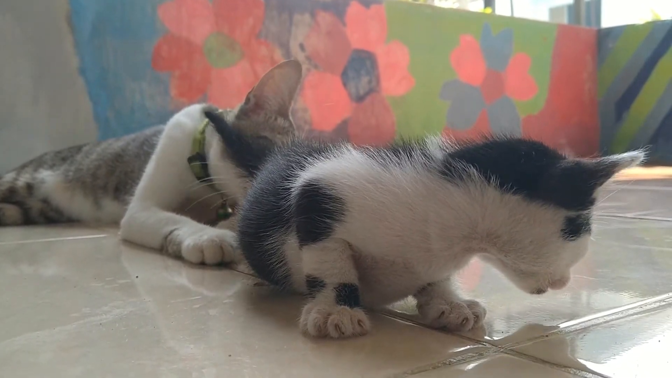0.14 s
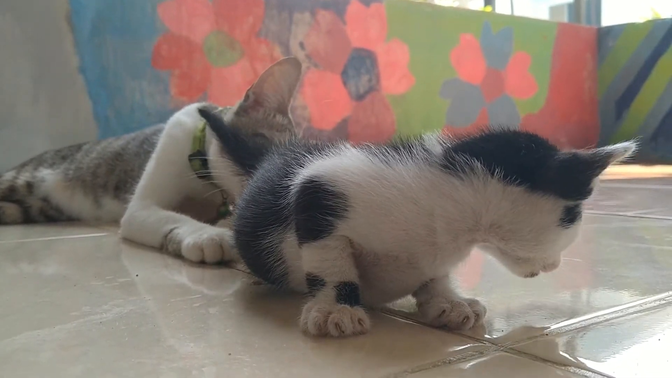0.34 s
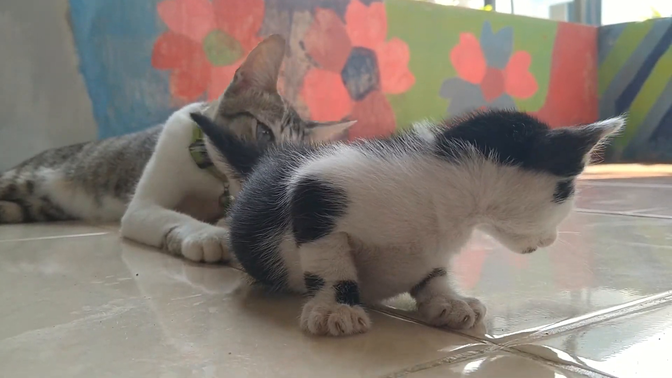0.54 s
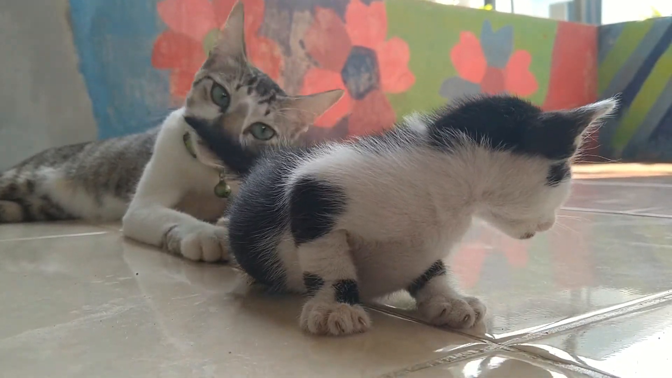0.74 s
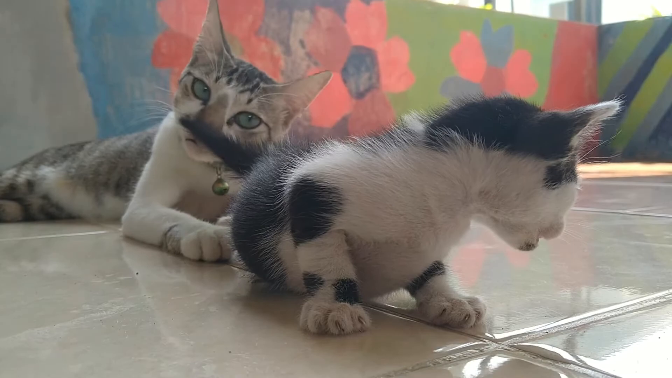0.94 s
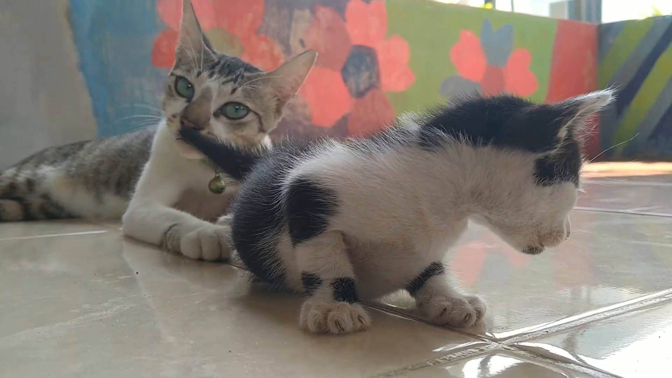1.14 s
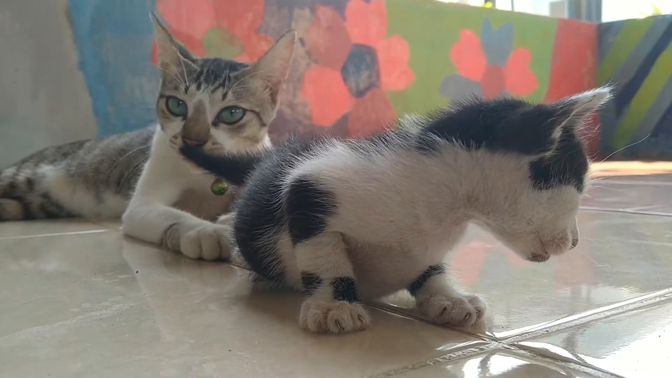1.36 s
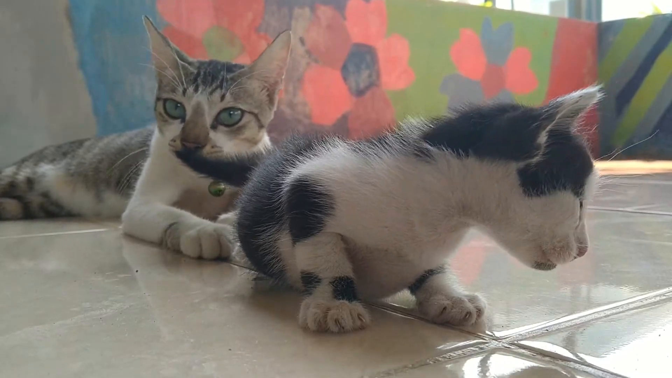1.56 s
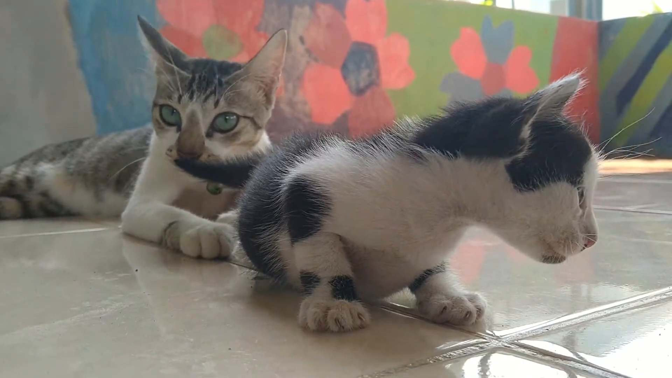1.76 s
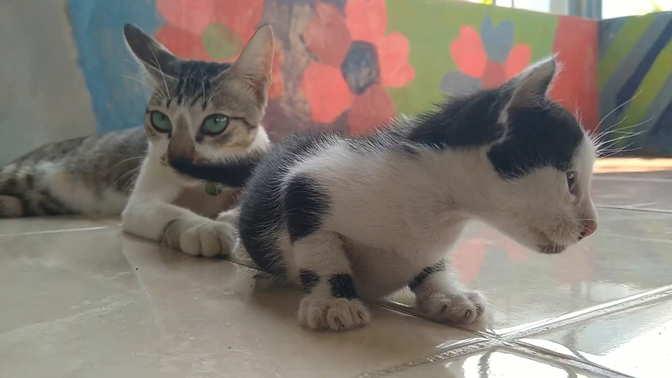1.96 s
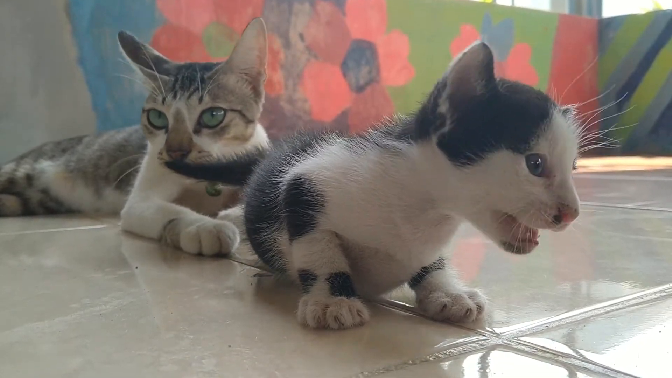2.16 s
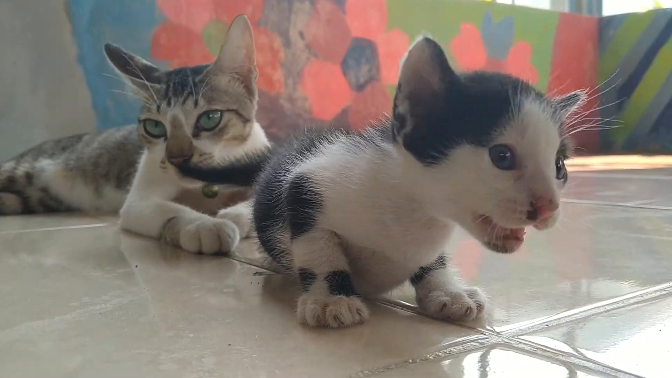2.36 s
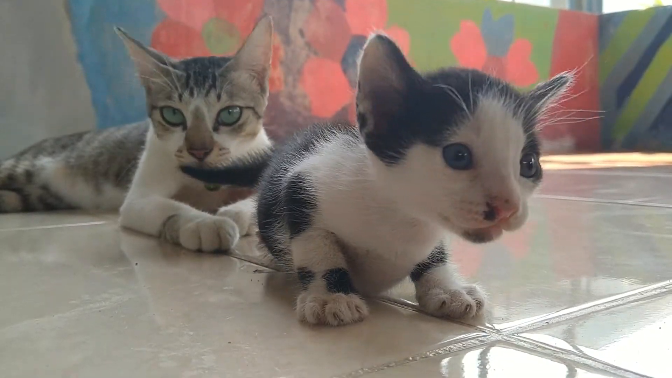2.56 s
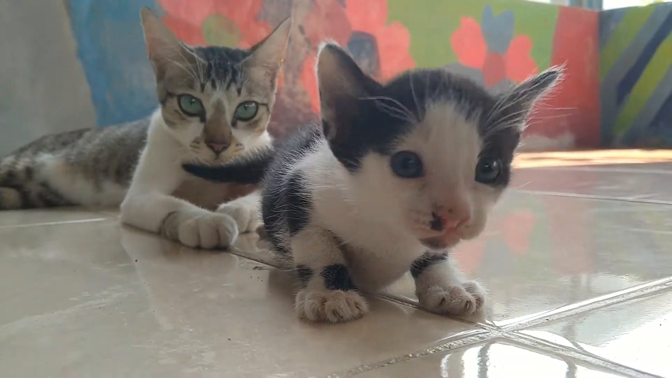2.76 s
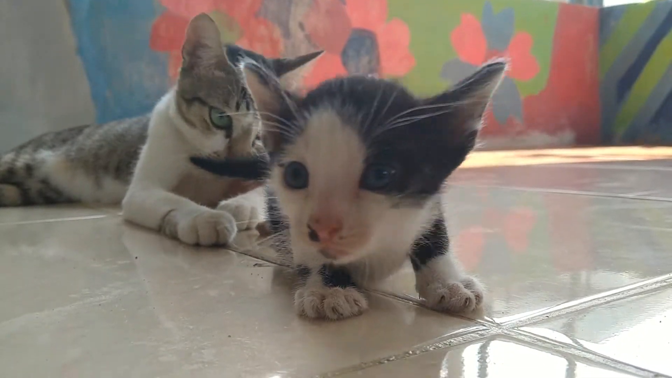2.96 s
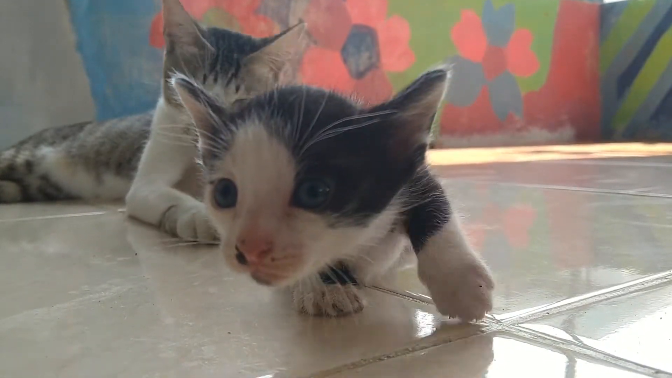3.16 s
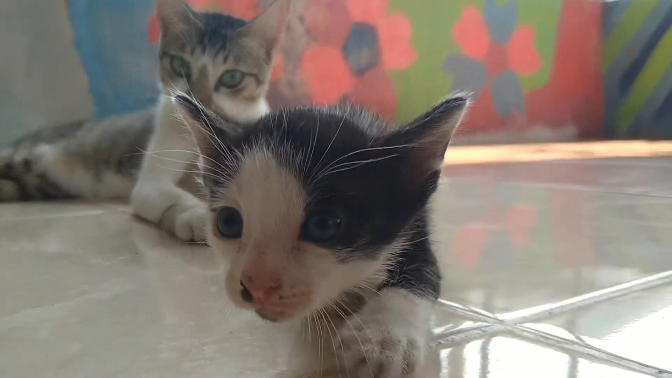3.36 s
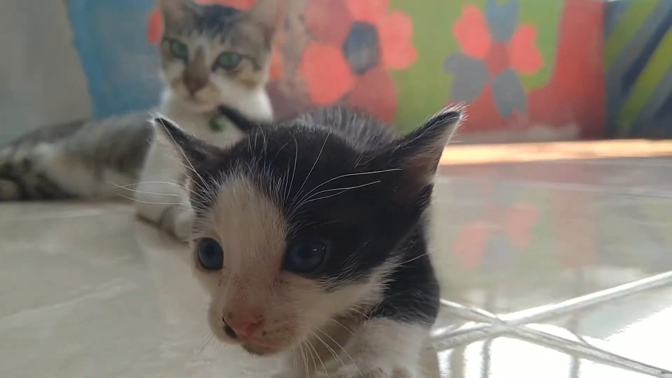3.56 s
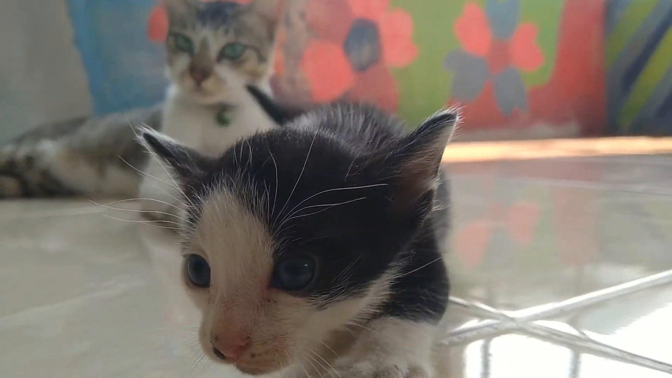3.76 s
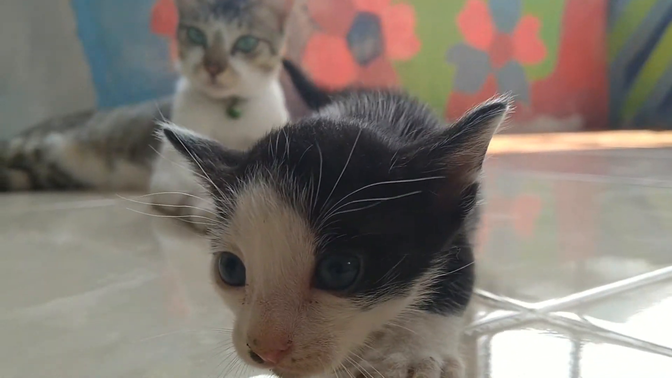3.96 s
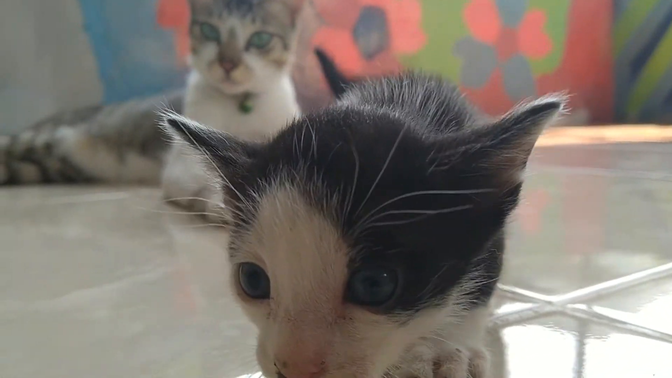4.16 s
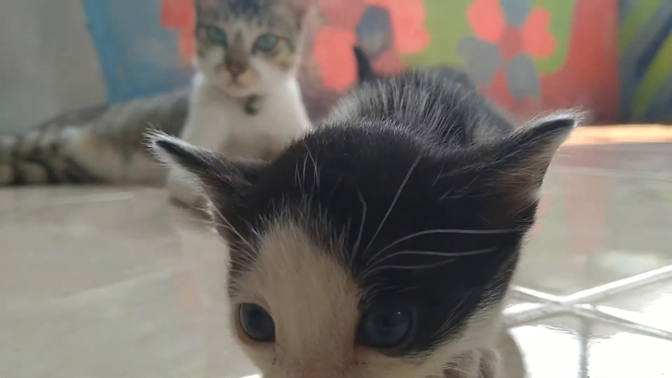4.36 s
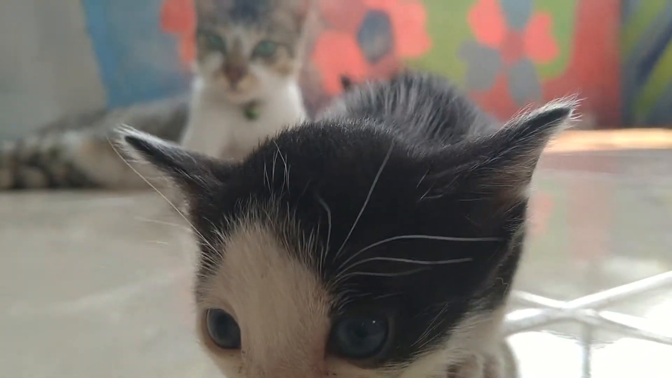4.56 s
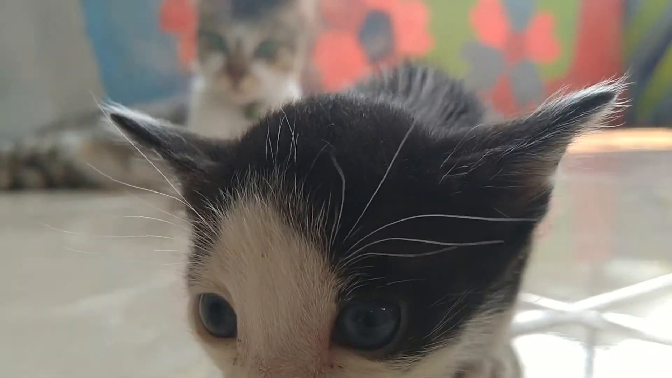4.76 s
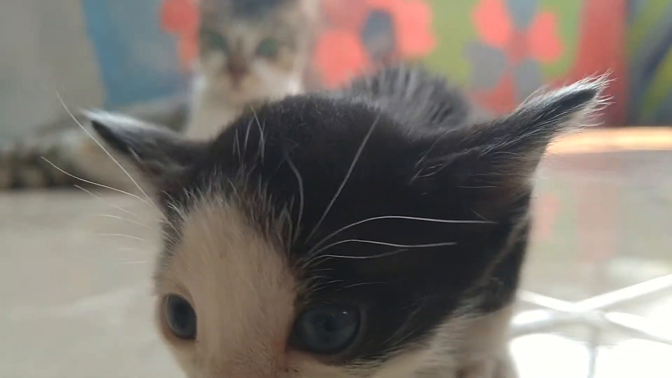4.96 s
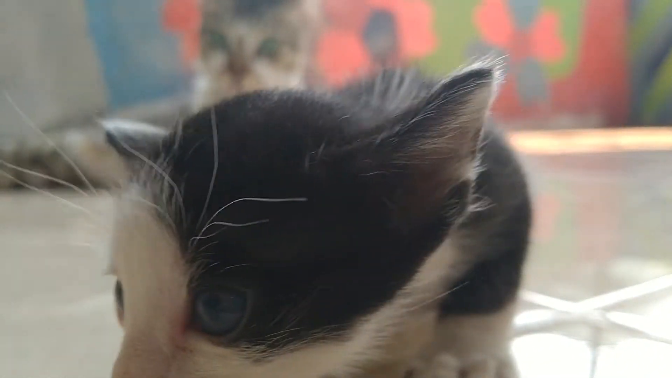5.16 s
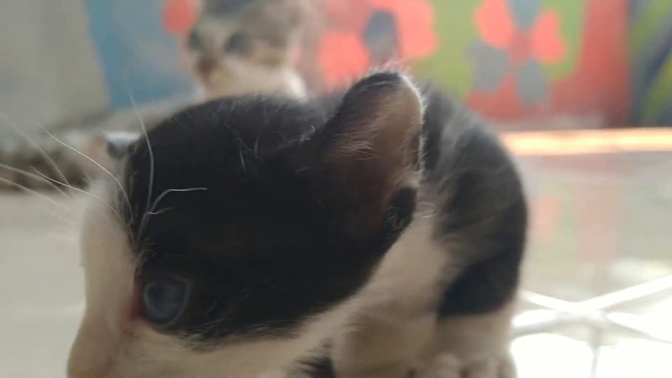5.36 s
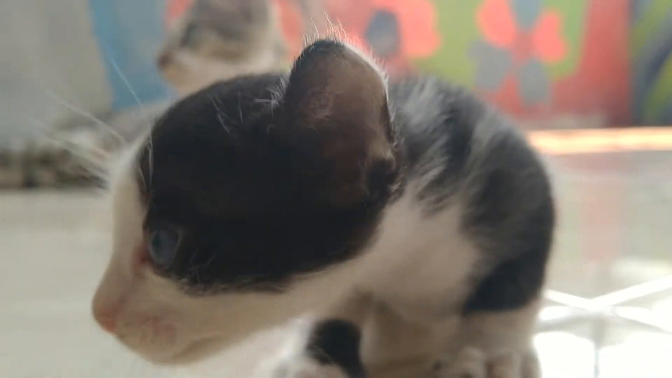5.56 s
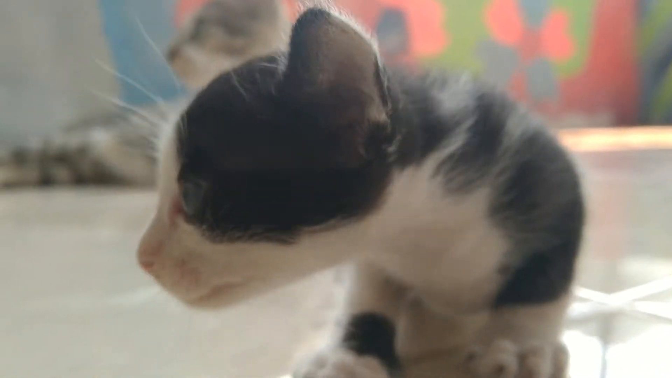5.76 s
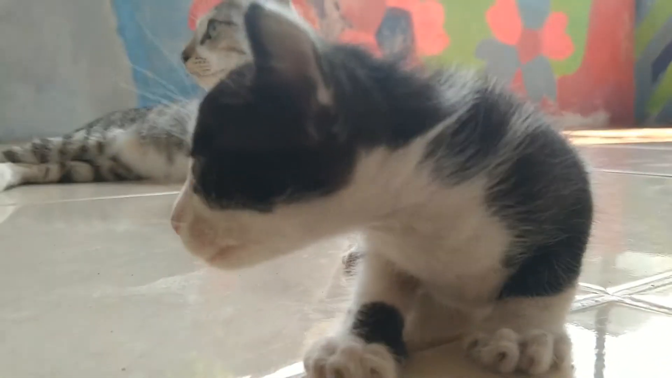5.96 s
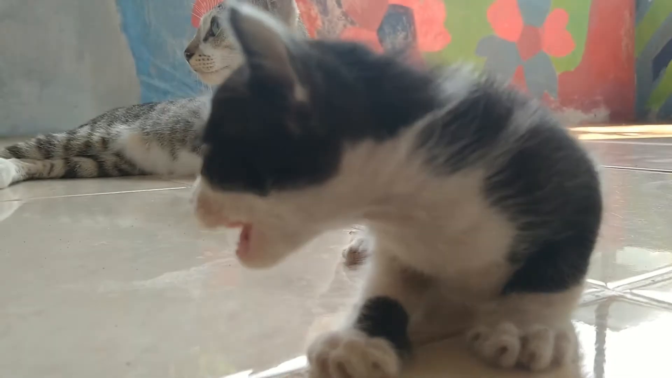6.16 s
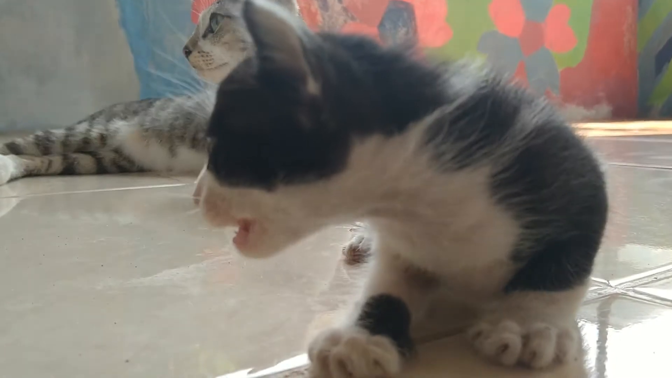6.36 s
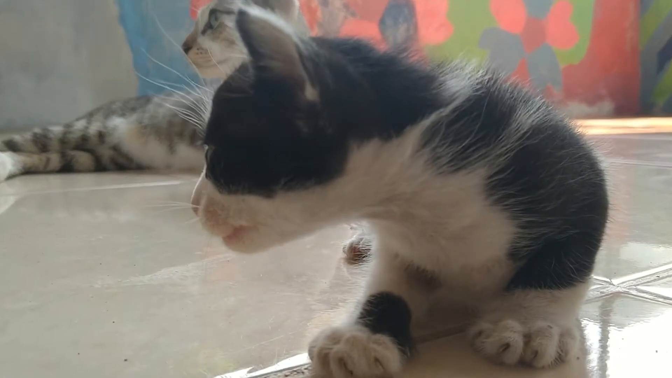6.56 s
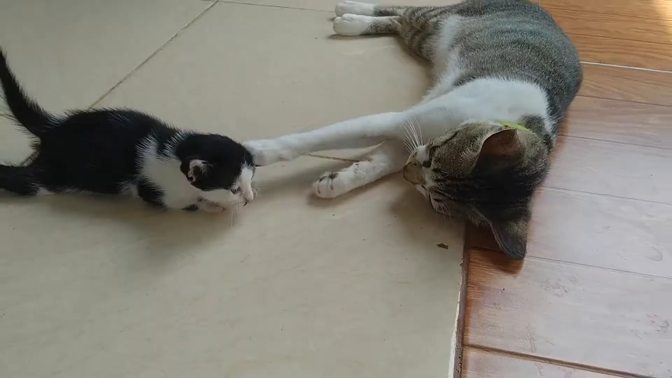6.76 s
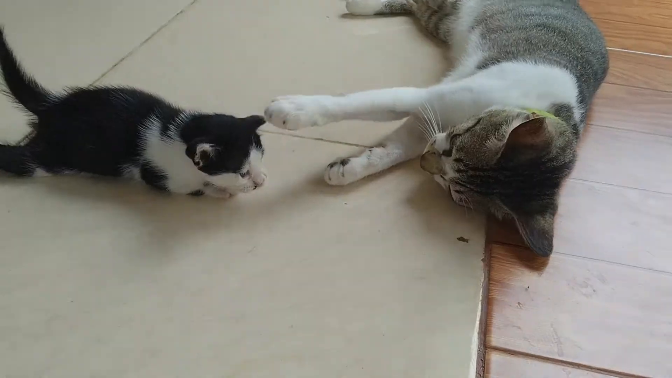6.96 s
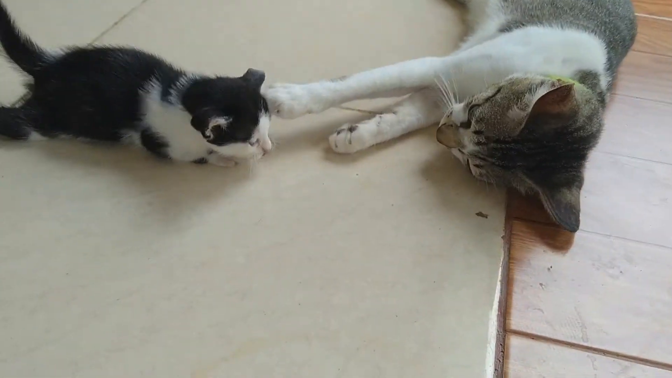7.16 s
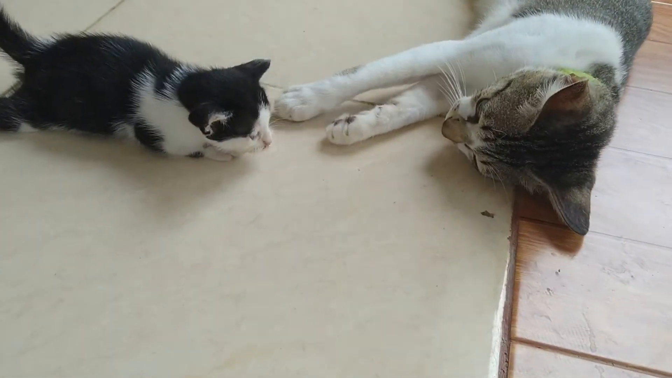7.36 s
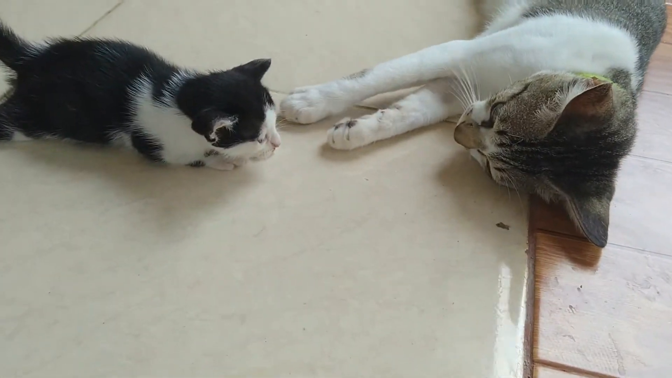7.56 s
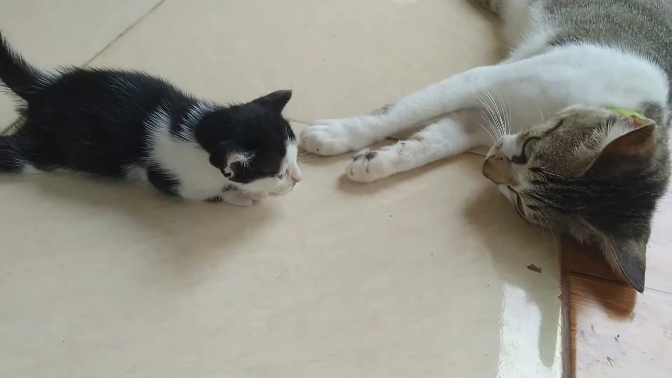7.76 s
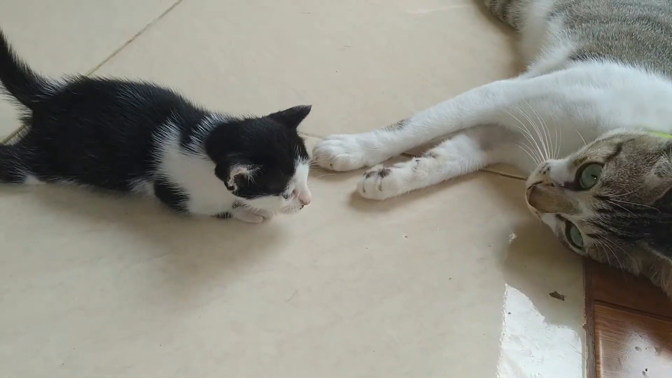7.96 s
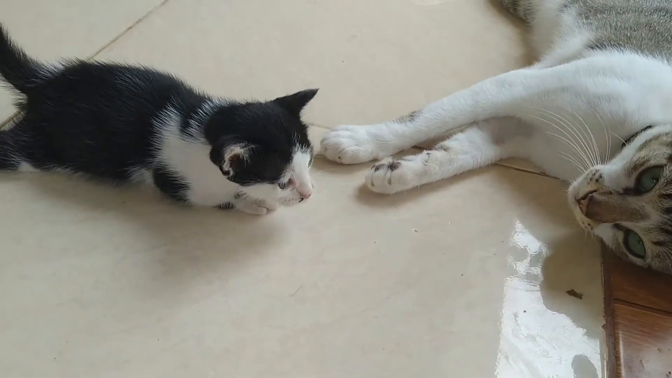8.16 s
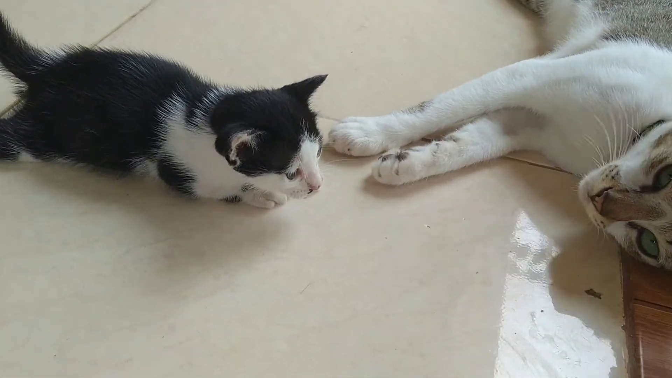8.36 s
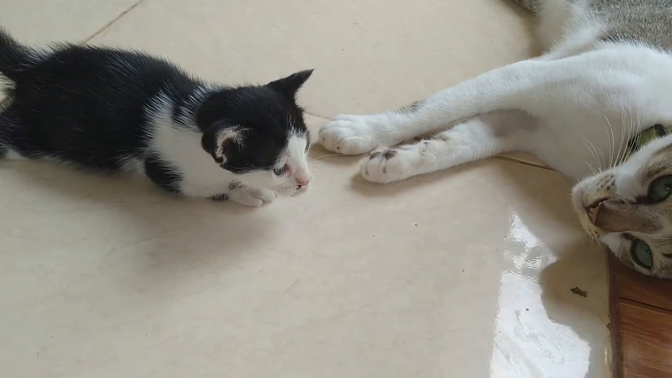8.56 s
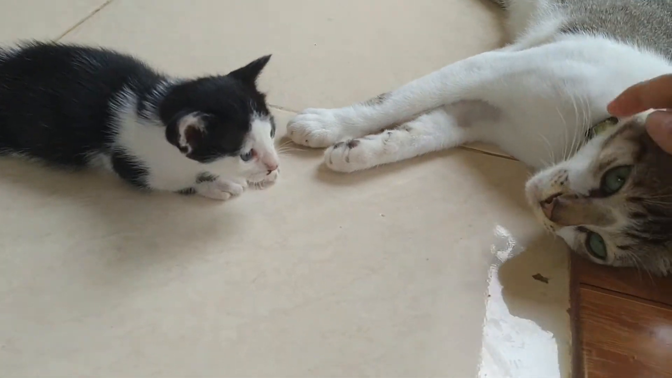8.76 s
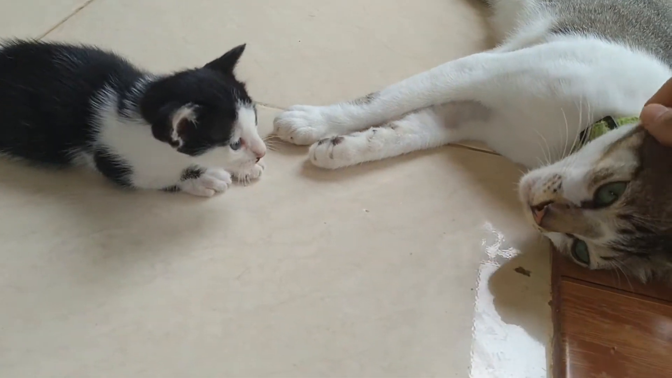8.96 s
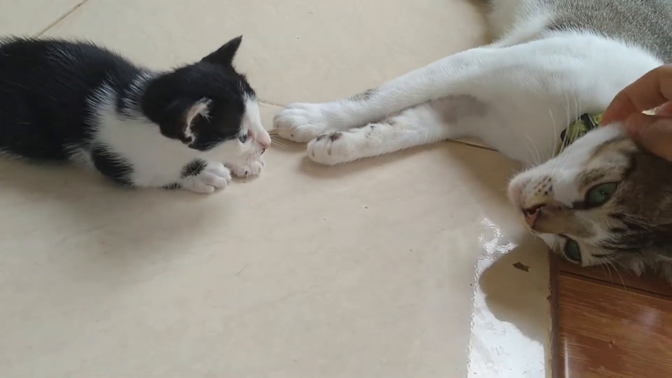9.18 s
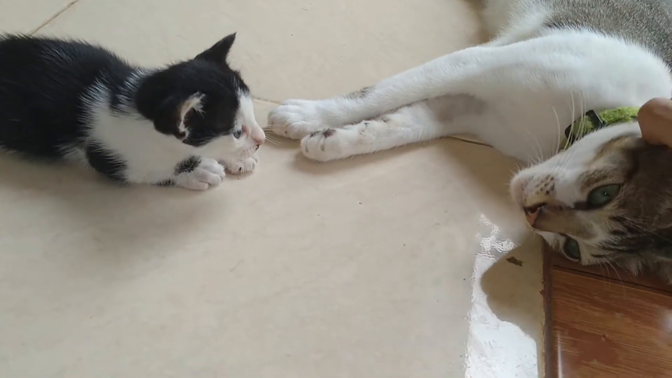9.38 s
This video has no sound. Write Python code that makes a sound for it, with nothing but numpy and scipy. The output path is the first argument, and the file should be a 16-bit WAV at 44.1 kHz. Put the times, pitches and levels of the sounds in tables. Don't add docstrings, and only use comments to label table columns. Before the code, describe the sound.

A tiled porch with short bright reflections, a murmuring street, low motor hum and faint hiss. A kitten across the floor gives quick high mews, scooping up and falling, at about 0.7, 1.5, 2.6, 3.4, 4.35, 5.65 and 6.4 seconds. A nearer kitten adds a short shaky mew at 1.0, a longer open one at 2.3 and a loud shrill one at 6.2. Light claw ticks and fur scuffs gather from 3.8; at 4.6 something falls with a dull double knock, sliding out by 5.0 into thin nose whistles. More paw ticks come around 5.6-5.9. Silence falls at 6.75-6.93. Then a quieter corner: softly beating hum, a faint motor winding up around 7-7.5, distant falling bird whistles and a hoarse chirp between 7.6 and 8.3, a low soft mew at 8.6, then small ticks with a tiny collar bell at 9.1-9.4.

```python
import sys
import numpy as np
from scipy import signal
from scipy.fft import rfft, irfft, next_fast_len
from scipy.io import wavfile
from scipy.ndimage import uniform_filter1d

SR = 44100
rng = np.random.default_rng(int(sys.argv[2]) if len(sys.argv) > 2 else 0)


def elevation(decibels):
    levels = np.asarray(decibels, float)
    return 10 ** (levels / 20)


def waveform_to_disk(signal):
    frames = np.transpose(np.atleast_2d(signal))
    scaled = np.clip(frames, -1, 1) * 32767
    samples = np.round(scaled).astype(np.int16)
    wavfile.write(sys.argv[1], SR, samples)


N = 415422


def at_hz(points, hz):
    points = np.array(points)
    return np.interp(np.log(hz), np.log(points[:, 0]), points[:, 1])


def in_time(rows):
    s, *columns = np.transpose(rows)
    return [np.interp(np.arange(N) / SR, s, column) for column in columns]


def drift(rate, count=N):
    step = SR / rate / 2
    points = int(count / step) + 2
    heights = rng.standard_normal(count // 100 + 2)[:points]
    return np.interp(np.arange(count) / step, np.arange(points), heights)


def voice(tables, mouth, jitter, shimmer_db, breath_db, count, shake=np.zeros(N)):
    out = np.zeros(N)
    for rows in tables:
        s, pitch, *levels = np.transpose(rows)
        at = np.arange(round(s[0] * SR), min(round(s[-1] * SR), N))
        t = at / SR
        glide_window = min(SR // 70, len(at) // 8)
        glide = uniform_filter1d(np.interp(t, s, pitch), size=glide_window, mode="nearest")
        waver = drift(40, count=len(at)) + drift(150, count=len(at))
        hz = glide * (1 + shake[at] + jitter * waver)
        turn = 2 * np.pi * np.cumsum(hz) / SR
        gains = [elevation(np.interp(t, s, db)) for db in levels]
        leader = gains[-1]
        for k in range(len(levels) + 1, count + 1):
            gains.append(leader * elevation(at_hz(mouth, k * hz)))
        call = np.zeros(len(at))
        for k, gain in enumerate(gains, 1):
            shimmer = elevation(shimmer_db * np.sqrt(k) * np.tanh(drift(120, count=len(at))))
            call += gain * shimmer * np.sin(k * turn)
        hiss = np.diff(rng.standard_normal(len(at) + 1))
        breath = hiss * (1 + np.cos(turn)) * elevation(breath_db) * gains[-1]
        edge = np.clip(np.minimum(t - s[0], s[-1] - t) / 0.003, 0, 1)
        out[at] += np.sqrt(2) * edge * (call + breath)
    return out


def mew_curves(mews, mouthing, flares, bright, chest, partials, scoop_s, tails):
    mew_s, climb_hz_per_s = .385, 400
    end_hz, droop_s = 740, .11
    late_db, late_s = 25, 0.021
    tail_s, tail_swell_db = .33, 41.5
    t = np.linspace(0, mew_s, 79)
    tables = []
    for mew, mouth, flare, bright_db, chest_db, tail_db in zip(mews, mouthing, flares, bright, chest, tails):
        s, scoop, crest, top_hz, sag = mew
        effort_db, widest, closing, nasal_db = mouth
        flare_at, flare_db, half = flare
        pitch = top_hz * (1 - scoop * np.exp(-t / scoop_s)) - sag * np.maximum(t - crest, 0)
        pitch -= climb_hz_per_s * np.maximum(crest - t, 0)
        pitch += (end_hz - pitch) * np.clip(1 - (mew_s - t) / droop_s, 0, 1) ** 2
        changes = [(0, chest_db, 0, 0, 0), (widest, 0, 0, 0, closing), (0, nasal_db, 0, 0, 0),
                   (0, bright_db, 0, 0, 0)]
        levels = []
        for peak, db, follows, swell_db, fade in np.array(partials) + changes:
            swell = swell_db * np.maximum(1 - t / peak, 0) ** 2
            levels.append(db + follows * effort_db - swell - fade * np.maximum(t - peak, 0))
        levels[1] = levels[1] - late_db * np.exp(-(t / late_s) ** 2)
        levels[1] = levels[1] + flare_db * np.exp(-((t - flare_at) / max(half, .004)) ** 2)
        levels[0] = np.maximum(levels[0], tail_db - tail_swell_db * (1 - t / tail_s) ** 2)
        tables.append(np.transpose([s + t, pitch, *levels]))
    return tables


def near_kitten():
    # time_s, pitch_hz, level_db, mouth_opening_db
    near_calls = [
        [(.985, 1166, -51, -13), (1.019, 1303, -44, -20), (1.037, 1424, -52.5, -14), (1.112, 1340, -35.5, -38),
         (1.163, 1217, -51, -25), (1.2, 1060, -46, -31), (1.245, 870, -68, -25)],
        [(2.271, 1335, -42, -10), (2.31, 1432, -41.5, -3), (2.344, 1445, -43, 11), (2.368, 1432, -41, 11),
         (2.388, 1415, -35, -3), (2.457, 1398, -33, -15), (2.476, 1322, -32, -24), (2.52, 1262, -36, -28),
         (2.545, 1240, -54, -30)],
        [(6.202, 1205, -43, -22), (6.224, 1300, -43, 4), (6.27, 1478, -45, 17), (6.287, 1535, -49, 3),
         (6.303, 1465, -48, 16), (6.375, 1380, -40, -1), (6.464, 1337, -28, -27), (6.515, 1240, -37, -24),
         (6.55, 930, -47, -30)],
    ]
    # level_db re partial 1, share of mouth opening followed
    near_partials = [(2.8, 0.98), (-25, 0.42), (-13, 0.63)]
    # frequency_hz, level_db re partial 4
    near_mouth = [(5000, -8), (7000, -8.5), (9000, -16), (11000, -20), (13500, -21), (15500, -20),
                  (16500, -45)]
    shrill_mouth = [(5000, -7.5), (7000, -6.5), (8500, -16), (11000, -26), (13000, -13.5), (14200, -13),
                    (15500, -14.5), (16500, -44.5)]
    # time_s, depth as share of pitch
    tremor = [(.9, .02), (1.2, .016), (2.28, .008), (2.31, .024), (2.39, .022), (2.42, .005), (2.47, .006),
              (2.5, .016), (6.2, .004), (6.3, .008), (6.36, .012)]
    tremor_hz = 47.5
    t = np.arange(N) / SR
    shake = in_time(tremor)[0] * np.sin(2 * np.pi * tremor_hz * t + 2.5 + .4 * drift(6.5))
    tables = []
    for rows in near_calls:
        table = []
        for s, hz, db, opening in rows:
            upper = [db + re_db + follows * opening for re_db, follows in near_partials]
            table.append((s, hz, db, *upper))
        tables.append(table)
    first, shrill, last = tables[0], tables[1], tables[2]
    calls = voice([first, last], near_mouth, jitter=.005, shimmer_db=2, breath_db=-4, count=12, shake=shake)
    return calls + voice([shrill], shrill_mouth, jitter=.008, shimmer_db=2, breath_db=0, count=12, shake=shake)


def far_kitten():
    # start_s, scoop share, crest_after_s, crest_hz, sag_hz_per_s
    far_calls = [
        (.712, .22, 0.078, 1442, 2000),
        (1.53, 0.21, 0.069, 1481, 2060),
        (2.63, 0.21, 0.061, 1492, 1066),
        (3.43, 0.17, 0.092, 1524, 2123),
        (4.35, 0.19, .085, 1541, 1990),
        (5.65, 0.17, 0.073, 1477, 1953),
        (6.415, 0.51, 0.087, 1516, 1683),
    ]
    # effort_db, widest_after_s, closing_db_per_s, nasal_edge_db
    mouthing = [(-15, 0.135, 190, 3), (-9, 0.14, 260, 2), (-3.5, 0.13, 217, 7.5), (-0.6, 0.096, 184.5, 1),
                (-1.5, 0.088, 152, 4.5), (-3, 0.11, 246, -2), (0, 0.18, 127, 3.5)]
    # after_s, lift_db, half_length_s
    flares = [(0.158, 10, 0.012), (0.134, 3.5, 0.014), (.122, 7.5, 0.008), (.112, 9, .012),
              (0.13, 10, .012), (0.126, 9.5, 0.0082), (0.09, 7, 0.014)]
    # level_db of partial 4 and above, of partial 1, of the hummed tail
    bright_db = [-10, 0, 4.5, -1.5, 2.5, -7, -0.5]
    chest_db = [0, 0, -2, -1.5, -0.5, 1.5, 2.5]
    tail_db = [-55.5, -58, -55, -56, -55, -61, -55]
    # peak_after_s, level_db, share of effort followed, swell_db, fade_db_per_s
    partials = [(0.085, -39, 0.48, 28, 60.5), (0.012, -32, 0.88, 18, 5.5), (0.047, -45, 0.73, 16, 120),
                (0.071, -53, 0.93, 18.5, 160)]
    # frequency_hz, level_db re partial 4
    far_mouth = [(5000, -10.5), (7500, -7), (9000, -24.5), (12000, -23), (15500, -25.5)]
    mews = mew_curves(far_calls, mouthing, flares, bright_db, chest_db, partials, 0.012, tail_db)
    return voice(mews, far_mouth, jitter=.003, shimmer_db=1.4, breath_db=-11, count=11)


def soft_mew():
    # start_s, scoop share, crest_after_s, crest_hz, sag_hz_per_s
    soft_call = [
        (8.575, 0.012, 0.13, 1037, 513),
    ]
    # effort_db, widest_after_s, closing_db_per_s, nasal_edge_db
    mouthing = [(0, .25, 170, 0)]
    # after_s, lift_db, half_length_s
    flare = [(.25, 3.4, .02)]
    chest_db = [0]
    tail_db = [-56]
    # peak_after_s, level_db, share of effort followed, swell_db, fade_db_per_s
    partials = [(0.15, -52, 1, 12, 200), (0, -62, 1, 52, 0), (0.125, -50.5, 1, 11, 300),
                (0.053, -68.5, 1, 14, 130)]
    # frequency_hz, level_db re partial 4
    soft_mouth = [(4100, 0), (5100, -16), (6200, -1), (7200, -18), (12000, -24)]
    mews = mew_curves(soft_call, mouthing, flare, [0], chest_db, partials, 0.0306, tail_db)
    return voice(mews, soft_mouth, jitter=.004, shimmer_db=2.2, breath_db=-12, count=11)


def nose_whistles():
    # time_s, pitch_hz, level_db
    whistles = [
        [(4.9, 13900, -76), (4.96, 14800, -68), (5.02, 15100, -73), (5.09, 14900, -76), (5.16, 14150, -77),
         (5.25, 14250, -75), (5.29, 13500, -78)],
        [(4.93, 11000, -80), (5.0, 11650, -87), (5.1, 11500, -83)],
        [(5.07, 9700, -77), (5.11, 10500, -86), (5.17, 9850, -81), (5.35, 9100, -81)],
        [(4.99, 8900, -83), (5.14, 8300, -78), (5.27, 8650, -76), (5.39, 8000, -70)],
        [(1.9, 10950, -90), (1.95, 12500, -86), (2.06, 14000, -74), (2.13, 14100, -76), (2.25, 15300, -80)],
        [(1.96, 8000, -78), (2.05, 8800, -79), (2.15, 9700, -87)],
        [(1.19, 5300, -74), (1.23, 5200, -71), (1.28, 5200, -72)],
        [(.2, 3470, -68), (.27, 3450, -57)],
    ]
    return voice(whistles, None, jitter=.004, shimmer_db=5, breath_db=-40, count=1)


def coloured(spectrum, patchy_db):
    long = next_fast_len(N)
    hz = np.maximum(np.arange(long // 2 + 1) * SR / long, 1)
    inside = (hz > spectrum[0][0]) & (hz < spectrum[-1][0])
    shaped = rfft(rng.standard_normal(long)) * elevation(at_hz(spectrum, hz)) * inside
    place = 1.5 * np.log2(hz / 40)
    out = np.zeros(N)
    for k in range(max(int(place[inside].min()), 0), int(place[inside].max()) + 2):
        band = irfft(shaped * np.clip(1 - abs(place - k), 0, 1), long)[:N]
        out += band * elevation(patchy_db * drift(7))
    return out / out.std()


def knock():
    # time_s, level_db, scrape_db re level
    course = [
        (4.55, -62.5, -1),
        (4.575, -33, -44),
        (4.592, -23, -18),
        (4.602, -18.5, -12),
        (4.668, -20, -17),
        (4.68, -20, -12.5),
        (4.78, -30, -8),
        (4.88, -36.5, -12),
        (5.0, -55.5, -25),
    ]
    # frequency_hz, level_db per Hz
    body = [(29, -50.5), (50, -24.5), (75, -13), (172, -7), (262, -7), (378, -16), (589, -5.5), (866, -6),
            (1090, -3), (1220, -9), (1460, -1), (5000, -25.5), (6500, -45.5), (11000, -120)]
    scrape = [(2350, -21), (4000, -1), (4780, -13), (6000, -9), (8360, 1), (9320, -5), (15700, -21.5)]
    before = [(0, -120, 0.008), (course[0][0] - .01, -120, 0)]
    after = [(course[-1][0] + .1, -120, 0)]
    level_db, scrape_db = in_time(before + list(course) + after)
    lumps = elevation(level_db + 1.2 * drift(45))
    return lumps * (coloured(body, patchy_db=-2.5) + elevation(scrape_db) * coloured(scrape, patchy_db=1.5))


def puffs(events, rise_s):
    out, t = np.zeros(N + SR), np.arange(SR // 3) / SR
    for s, db, hz, octaves, t60 in events:
        edges = np.clip(hz * 2 ** (np.array([-.5, .5]) * max(octaves, .1)), 100, 18000)
        band = signal.butter(3, edges, "band", fs=SR, output="sos")
        puff = signal.sosfilt(band, rng.standard_normal(len(t)))
        shape = np.minimum(t / rise_s, 1) * elevation(db - 60 * t / max(t60, .005))
        out[round(s * SR):][:len(t)] += shape * puff / puff.std()
    return out[:N]


def paws_and_fur():
    # start_s, peak_db, centre_hz, width_octaves, t60_s
    claw_ticks = [(2.5194, -48, 9000, 1.2, 0.03), (2.575, -51, 5000, 1.3, 0.022),
                  (4.017, -28, 2070, 1.6, 0.021), (4.018, -39, 8500, 0.22, 0.027),
                  (4.201, -35.5, 2400, 0.84, 0.03), (4.341, -40, 2397, 3.1, 0.016),
                  (4.341, -37, 9500, 0.82, 0.014), (5.5707, -34, 1800, 0.92, 0.06),
                  (5.611, -33, 1900, 1.3, 0.028), (5.632, -42, 3000, 1.2, .03),
                  (5.7144, -32, 3500, 2, 0.018), (5.7144, -31, 9500, .9, 0.016),
                  (5.8441, -30.5, 2700, 1, 0.036), (5.905, -52, 2770, 2.3, 0.033),
                  (3.8115, -30.5, 1480, .4, .05), (3.82, -33, 794, .2, .08), (3.846, -35, 1900, 2.3, 0.02),
                  (3.907, -39.5, 3500, 0.79, 0.03), (3.905, -47, 8560, 0.24, 0.045),
                  (4.094, -36, 2500, 1.2, 0.03), (4.153, -39.5, 2500, 1.1, .03),
                  (6.202, -33, 1450, 0.42, .04), (5.694, -43.5, 8000, 1.5, .02),
                  (5.824, -44, 9000, 1.2, .02), (7.453, -42, 2110, 1.2, 0.028)]
    bell_clicks = [
        (8.75, -48, 4840, 0.47, 0.02),
        (9.0962, -47, 5000, 2, 0.012),
        (9.187, -41.5, 4900, .6, 0.022),
        (9.3785, -66, 4260, 0.5, 0.03),
    ]
    blows = [
        (4.597, -22, 1300, 1.6, 0.06),
        (4.633, -27, 900, 2.5, .07),
        (4.675, -23, 6000, 2.3, 0.08),
        (4.708, -26.5, 1800, 1.3, 0.043),
        (4.752, -22, 1500, 1.2, 0.19),
        (4.835, -30, 1080, .15, .1),
        (4.838, -32, 1500, 0.14, .1),
    ]
    scuffs = [(.32, -46, 1110, 0.82, 0.74), (1.26, -60.5, 3800, 0.32, 0.63), (.01, -67, 6100, 1.1, 2.1),
              (2.3, -65, 13350, .4, 1.6), (2.64, -68, 12500, .6, 1), (3.24, -73, 12800, 0.45, 3.0),
              (3.33, -71.5, 14000, .3, 2.5), (3.42, -65.5, 13700, .3, 1.2), (3.81, -43, 1930, 1.2, 0.25),
              (5.439, -39, 2540, 0.96, 0.14), (5.562, -59, 6980, 1.6, 1.5), (7.67, -51, 2300, 0.41, 0.18),
              (7.91, -49.5, 3460, 0.45, 0.72), (7.915, -56, 7500, 0.32, 0.35), (7.915, -64, 10000, .4, .3),
              (3.86, -56, 3750, .3, 1.6), (2.765, -66, 15500, .06, .5), (8.501, -56, 6530, 1.2, 0.5),
              (8.5, -51.5, 2530, 0.66, 0.53), (6.97, -72, 13500, .5, 1.0), (8.55, -76, 13000, .5, 2.0),
              (.35, -72, 9400, 0.87, 1.5)]
    contacts = [*claw_ticks, *bell_clicks, *blows]
    return elevation(-6.0) * puffs(contacts, rise_s=.002) + puffs(scuffs, rise_s=0.015)


def dry_rustles():
    # start_s, peak_db, centre_hz, width_octaves, t60_s
    rustles = [
        (4.578, -24.5, 1080, .5, .22),
        (4.594, -37, 11000, 1.2, .12),
        (4.76, -52, 12500, .7, .45),
        (8.17, -56, 560, .25, .5),
        (3.79, -64, 8400, .2, 1.5),
        (4.04, -62, 8500, .25, .6),
        (5.41, -60, 4000, 1.5, .1),
        (4.62, -36, 200, .6, .5),
    ]
    return puffs(rustles, rise_s=0.015)


def bell():
    # start_s, peak_db, hardness_db
    strikes = [
        (8.7515, -70, 3),
        (9.0975, -57, -4),
        (9.107, -57, 4),
        (9.111, -62, 0),
        (9.1875, -61, 8),
        (9.196, -63, 8),
        (9.379, -74, 0),
    ]
    # frequency_hz, level_db, t60_s, share of hardness followed
    modes = [(4085, -1, .12, 0), (4210, -5, .12, 0), (4400, -6, .06, .3), (4990, -4, .022, 1),
             (5450, -7, .015, 1)]
    out, t = np.zeros(N + SR), np.arange(SR // 3) / SR
    for s, db, hard_db in strikes:
        for hz, mode_db, t60, share in modes:
            ring = elevation(db + mode_db + share * hard_db - 60 * t / t60) * np.sin(2 * np.pi * hz * t)
            out[round(s * SR):][:len(t)] += ring
    return out[:N]


def birds_and_far_motor():
    # time_s, pitch_hz, level_db
    whistles = [
        [(7.641, 1042, -34), (7.655, 1063, -31), (7.675, 1000, -32), (7.69, 780, -43), (7.715, 716, -45)],
        [(8.08, 1090, -52), (8.108, 1102, -48), (8.118, 1085, -31), (8.135, 1020, -32), (8.15, 830, -38),
         (8.17, 546, -54)],
        [(8.26, 1098, -45), (8.29, 1082, -55), (8.315, 1050, -49), (8.33, 895, -60)],
    ]
    chirp = [
        [(7.908, 3390, -64), (7.92, 3560, -57), (7.935, 3707, -41), (7.955, 3690, -51), (7.975, 3683, -45),
         (7.99, 3670, -65)],
    ]
    wind_up = [
        [(6.93, 1490, -78), (7.1, 1865, -60.5), (7.32, 2380, -64.5), (7.45, 2396, -77), (7.6, 2510, -97)],
    ]
    # frequency_hz, level_db re first
    whistle_overtone = [(1500, -35), (2150, -42)]
    chirp_overtone = [(6800, -15), (7300, -19)]
    wind_up_overtone = [(3000, 16), (3700, -5), (4700, -12)]
    out = voice(whistles, whistle_overtone, jitter=.006, shimmer_db=1.5, breath_db=-30, count=2)
    out += voice(chirp, chirp_overtone, jitter=.008, shimmer_db=4, breath_db=-14, count=2)
    motor = voice(wind_up, wind_up_overtone, jitter=.014, shimmer_db=4, breath_db=-30, count=2)
    return out + elevation(-4) * motor


def hum(orders):
    # time_s, level_db
    hum_swell = [(0, -4), (.8, -2), (2.5, .5), (6.7, 2.5), (7, -4.5), (9.4, -1.5)]
    motor_hz = 46.86
    turn = 2 * np.pi * motor_hz * np.arange(N) / SR
    lines = np.zeros(N)
    for k, db in orders:
        lines += np.sqrt(2) * elevation(db - 2.0 * drift(3.7)) * np.sin(k * turn + k * k)
    return elevation(in_time(hum_swell)[0]) * lines


def backdrop_lift():
    # peak_s, lift_db, length_s
    swells = [(0.02, 3, 1), (0.894, 5, 0.37), (1.116, 3, 0.18), (1.683, 3.5, 0.47), (2.404, 6, 0.41),
              (2.79, 4, 0.7), (3.542, 8, 0.38), (3.992, 4.5, 0.99), (4.445, 7.5, 0.34), (4.883, 5.5, 1),
              (5.48, 3, 0.41), (5.776, 6.5, 0.6), (6.343, 5.5, 0.28), (6.542, 5.5, 0.47), (7.036, 4.5, 0.42),
              (7.293, 2.5, 0.61), (7.702, 6, 0.16), (8.132, 7.5, 0.55), (8.548, 8.5, 0.14),
              (8.746, 2.5, 0.82)]
    rise_share = 0.55
    t = np.arange(N) / SR
    lifts = []
    for s, db, long in swells:
        corners = [s - rise_share * long, s, s + (1 - rise_share) * long]
        lifts.append(np.interp(t, corners, [0, db, 0]))
    return np.max(lifts, axis=0)


def backdrop(street_db, air_db, murmur, orders):
    # frequency_hz, level_db per Hz
    hiss = [(2350, -27.5), (4000, -3.5), (4540, -13), (5480, -13.5), (6880, -11), (8410, -3.5), (9980, -15),
            (13200, -20), (14200, -20), (15700, -19)]
    lift_db = backdrop_lift()
    street = elevation(street_db + lift_db + 2.5) * coloured(murmur, patchy_db=.9)
    air = elevation(air_db + 1.9 * lift_db + 1.5) * coloured(hiss, patchy_db=.6)
    return street + air + hum(orders)


def porch_backdrop():
    # frequency_hz, level_db per Hz
    murmur = [(24, -63), (40, -28.5), (69, -13.5), (129, 0.5), (193, -1), (248, -5), (281, -3),
              (361, -10.5), (455, -11.5), (598, -5.5), (872, -7), (1710, -4), (2650, -17.5), (3550, -21.5),
              (6000, -43.5), (7800, -69), (13200, -120)]
    orders = [(3, -58.5), (4, -57), (5, -66.5), (6, -55.5), (7, -58), (13, -66), (37.66, -61.5)]
    return backdrop(-51.5, -72.5, murmur, orders)


def corner_backdrop():
    # frequency_hz, level_db per Hz
    murmur = [(24, -64), (40, -26), (91, -7.5), (117, -3.5), (160, 1), (253, -6.5), (506, -10), (769, -4.5),
              (890, -8), (2100, -13.5), (3070, -21), (4030, -31), (6000, -35.5), (7800, -67), (13200, -120)]
    orders = [(3, -56), (3.14, -59), (4, -61.5), (5, -63), (7, -71.5), (10, -71.5), (12.5, -68.5),
              (29.85, -68)]
    return backdrop(-60.5, -79.5, murmur, orders)


def room(x, decays, gap_s):
    t, tail = np.arange(SR) / SR, np.zeros(SR)
    for hz in 250 * 2 ** np.arange(6):
        octave = signal.butter(2, [hz, 2 * hz], "band", fs=SR, output="sos")
        band = signal.sosfilt(octave, rng.standard_normal(SR))
        t60 = at_hz(decays, hz * np.sqrt(2))
        unit = np.sqrt(2 * np.log(1000) / t60 / SR)
        tail += band * elevation(-60 * t / t60) * unit * (t > gap_s)
    return signal.fftconvolve(x, tail)[:N]


def scene():
    # frequency_hz, t60_s
    tile_t60 = [(200, 0.37), (1000, 0.2), (3000, 0.31), (8000, 0.18), (15000, 0.23)]
    yard_t60 = [(500, 0.75), (1500, 0.43), (4000, 0.62), (9000, 0.32)]
    silence_start_s, silence_end_s = 6.743, 6.928
    t = np.arange(N) / SR
    before = np.clip((silence_start_s - t) / 0.0083, 0, 1)
    after = np.clip((t - silence_end_s) / 0.019, 0, 1)
    near, far, soft = near_kitten(), far_kitten(), soft_mew()
    small, ringing, birds = paws_and_fur(), bell(), birds_and_far_motor()
    sent = elevation(2) * far + elevation(-10) * soft + elevation(-5.5) * near + elevation(-9) * (small + ringing)
    direct = elevation(-2) * far + soft + elevation(1) * near + elevation(-6) * birds
    direct += elevation(-3) * nose_whistles() + small + knock()
    porch = direct + room(sent * before, tile_t60, gap_s=0.0032) + porch_backdrop()
    corner = direct + room(sent * after, tile_t60, gap_s=0.0023)
    corner += elevation(2.5) * room(birds, yard_t60, gap_s=0.0065) + corner_backdrop()
    return (before * porch + after * corner + ringing + dry_rustles())[None]


def roll_off(x):
    return signal.sosfilt(signal.butter(12, 15830, fs=SR, output="sos"), x)


def record(dry):
    return roll_off(dry)


dry = scene()
out = record(dry)
waveform_to_disk(out)
```